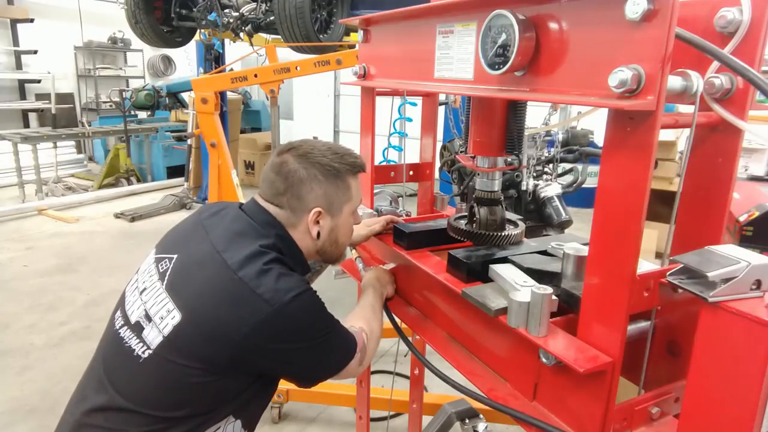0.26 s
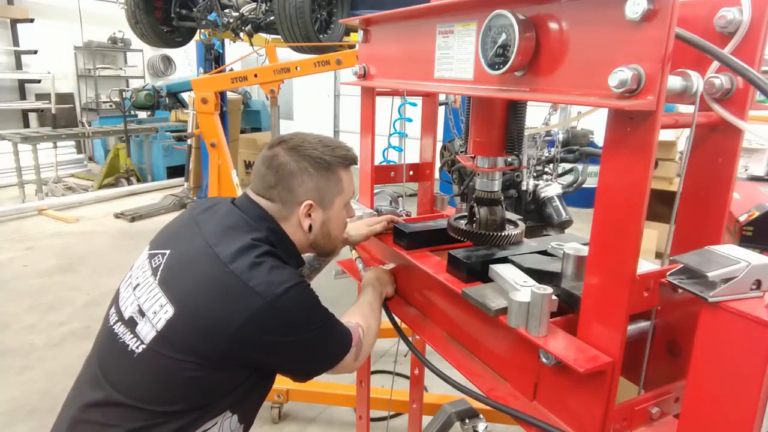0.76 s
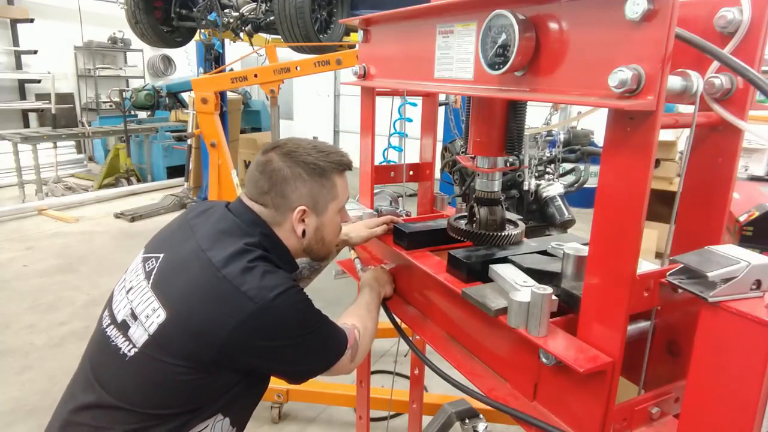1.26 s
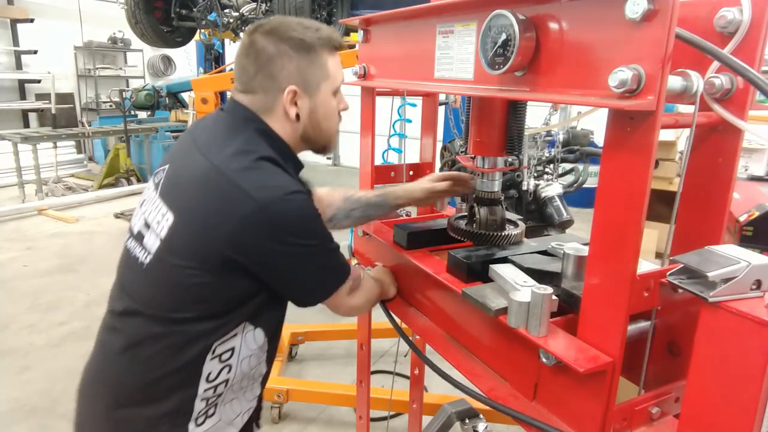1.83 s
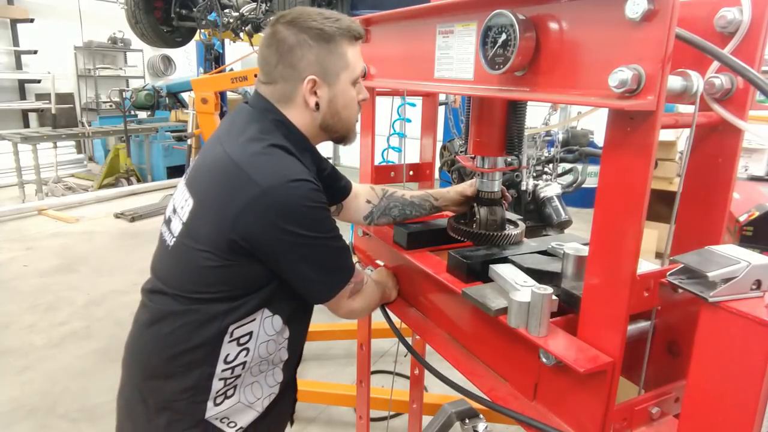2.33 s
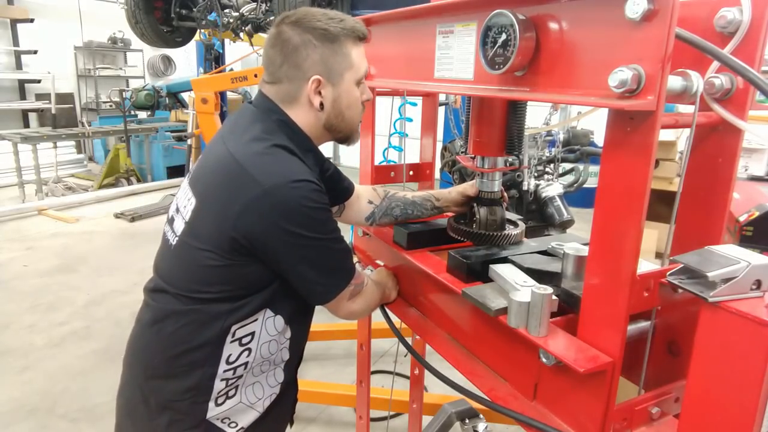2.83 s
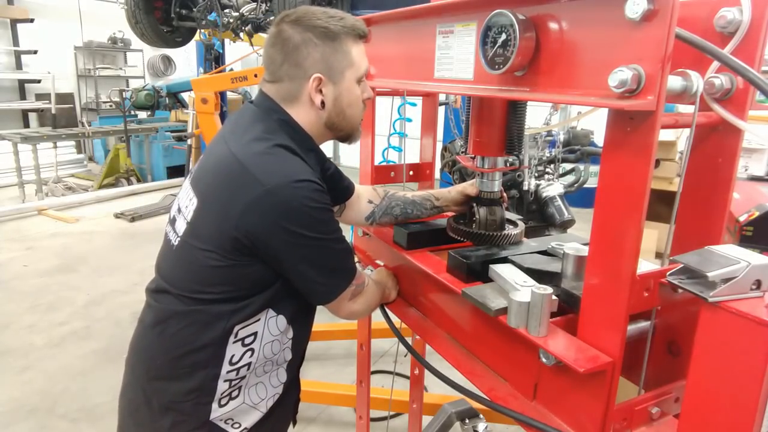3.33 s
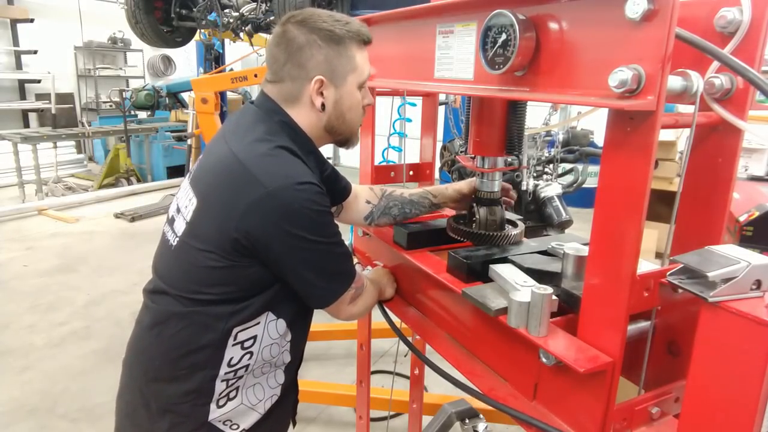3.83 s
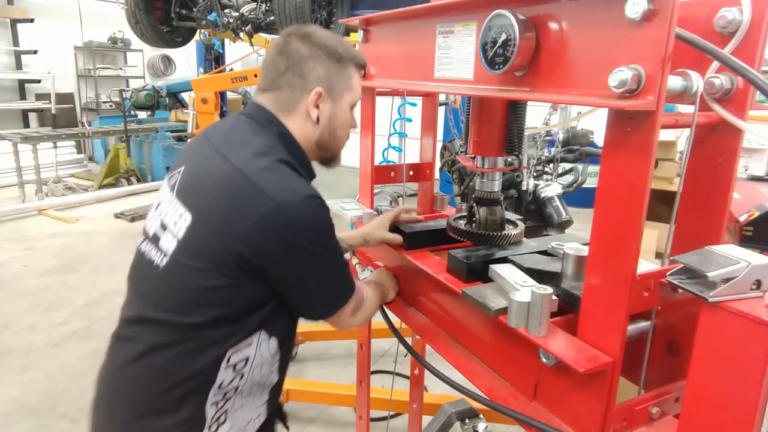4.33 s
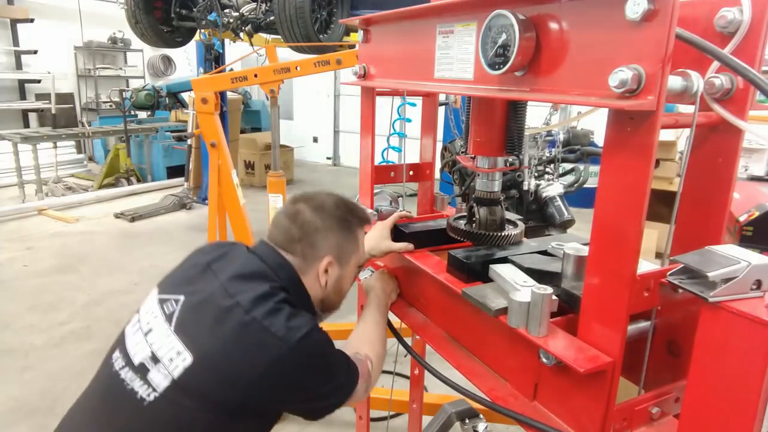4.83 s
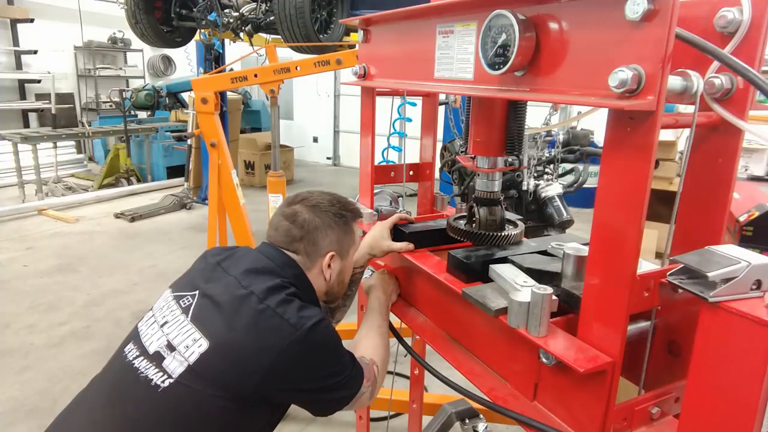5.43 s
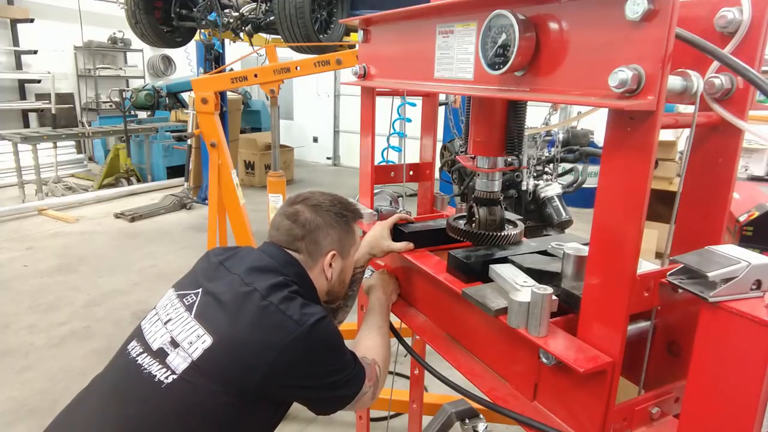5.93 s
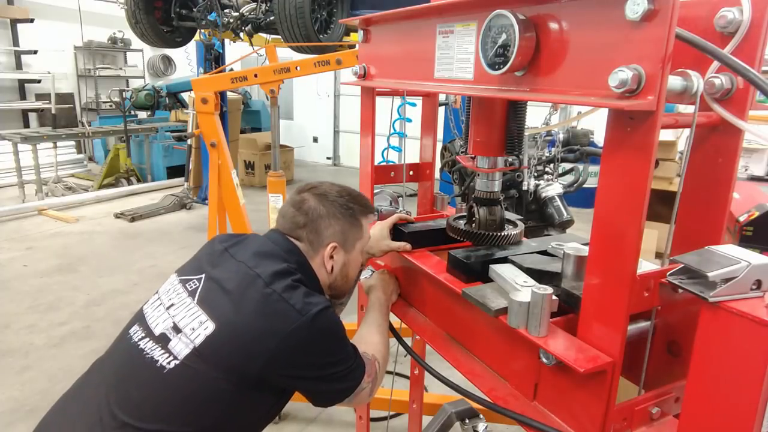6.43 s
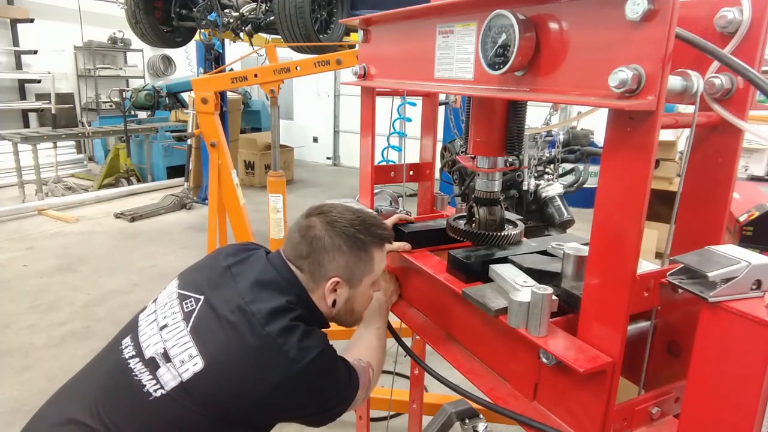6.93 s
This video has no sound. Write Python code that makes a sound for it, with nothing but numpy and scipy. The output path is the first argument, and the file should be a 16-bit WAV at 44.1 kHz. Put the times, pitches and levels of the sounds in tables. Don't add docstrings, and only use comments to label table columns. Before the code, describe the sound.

In a big hard-walled workshop, an air-powered press pump is already chattering close by, about nineteen strokes a second, each a bright valve hiss, metallic tick and dull exhaust pop shaking the steel frame. It weakens slightly, stops, and rings out. Over soft ventilation rumble come a small click, a scuff, a dull far knock, a rustle and tiny high squeaks, heard through two spaced microphone ports.

```python
import sys
import numpy as np
from scipy import signal
from scipy.fft import rfft, irfft, next_fast_len
from scipy.io import wavfile
from scipy.ndimage import uniform_filter1d

SR = 44100
rng = np.random.default_rng(int(sys.argv[2]) if len(sys.argv) > 2 else 0)


def how_loud(loudness_db):
    steps = np.asarray(loudness_db, float) / 20
    return 10 ** steps


def unload_audio(sound):
    columns = np.transpose(np.atleast_2d(sound))
    steps = np.round(np.clip(columns, -1, 1) * 32767)
    wavfile.write(sys.argv[1], SR, steps.astype(np.int16))


N = 316197
LEAD = int(1.5 * SR)
FULL = next_fast_len(N + 2 * LEAD)
HZ = np.maximum(np.arange(FULL // 2 + 1) * SR / FULL, 1)

# [f/Hz, level/dB per Hz]
AIR_FLOOR = [(25, -104), (58, -95), (72, -93), (92, -88), (110, -79), (250, -81), (500, -80.5),
             (900, -84.5), (1600, -91.5), (2800, -97), (5000, -102), (8000, -101), (12000, -103),
             (15500, -101)]
# [f/Hz, width/Hz, level/dB over it]
HUMS = [(110, 5, 7), (119, 2.5, 10), (155, 20, 5), (235, 8, 8), (266, 5, 5), (3620, 200, 6), (6450, 100, 3),
        (7250, 110, 7), (10000, 90, 7), (10750, 90, 6), (13800, 180, 5)]
# [t/s, rumble level/dB]
AMBIENCE = [
    (2.05, -68.5),
    (2.85, -62),
    (3.5, -62.5),
    (4.3, -61.5),
    (5.35, -62),
    (5.9, -64),
    (6.1, -65.5),
    (6.6, -67),
    (7.17, -68),
]
AIR_OVER_RUMBLE_DB = 3
# [t/s, f/Hz, level/dB]
ENGINE = [
    (2.3, 67.5, -85),
    (2.9, 68, -72),
    (4.1, 70.8, -72),
    (5.3, 72, -72),
    (6.3, 72.6, -81),
    (6.7, 68, -72),
]
# [f/Hz, level/dB over the rumble]
MOTOR = [(119.5, -5), (133, -1), (240, -7), (266, -.5), (399, -10)]
RIGHT_AHEAD_RAD = np.array([[0], [.7]])

# [f/Hz, t60/s, level/dB]
HALL = [(80, 1.6, 6), (242, 1.21, 4), (700, 1.62, -2), (1850, 1.66, -1), (4830, 1.23, 0.5), (9000, 0.58, 4),
        (14000, 0.33, 1.5)]
# [f/Hz, likeness/0-1, right lead/rad, left-right level/dB]
PORTS = [(99.7, 1, 1.52, 4.5), (300, 0.52, 1, -1.5), (970, 0.94, 0.27, 0.5), (2180, 0.97, 0.21, -2),
         (4350, 0.69, 0.3, -0.1), (6500, 0.88, 1.23, -0.3), (10000, 0.4, 1.7, 0), (11100, 0.73, 2.65, -3.5),
         (15500, 0.5, 4.5, -4.5)]
FLIP_HZ, FIRST_NULL_HZ = 1085, 1618

# [t/s, length/s, first f/Hz, last f/Hz, level/dB]
SQUEAKS = [
    (6.31, .03, 12900, 13300, -72),
    (6.345, .05, 14700, 15050, -70),
    (6.39, .13, 13500, 14800, -69),
    (6.618, .045, 15700, 14600, -68),
]
GLIDE_SHARE, SQUEAK_SWELL_DB = .6, 11

TICKS = [
    (5.933, -63, 8000, 2.5, 3),
    (6.668, -61, 5650, .2, 2.5),
]
SCUFFS = [
    (4.198, -48, 3900, 2.4, 25),
    (4.22, -62.5, 4940, .5, 310),
    (4.456, -45, 3240, 1.3, 13),
    (4.555, -49.5, 6500, 2.5, 73),
]
RUSTLES = [
    (4.96, -56.5, 8000, 2.2, 220),
]
TOUCH = [
    (4.400, -50.5, 9000, 2.8, 67),
    (4.407, -37, 636, 1.58, 150),
    (4.63, -36, 1120, 0.43, 4.2),
]
KNOCK = [
    (4.422, -28.5, 203, 1.54, 15),
    (4.461, -25, 830, 0.94, 17.4),
    (4.458, -35.5, 1840, 0.63, 28),
    (4.47, -50, 2670, .16, 49),
    (4.476, -26, 431, 0.77, 15.4),
    (4.5, -51, 2720, 0.93, 130),
    (4.505, -32.5, 300, 1.6, 43),
    (4.53, -47, 130, 0.92, 46),
    (4.565, -37, 300, 1.9, 5.7),
]
TICK_RISE_MS, TOUCH_RISE_MS, KNOCK_RISE_MS, SCUFF_RISE_MS, RUSTLE_RISE_MS = .7, 4, 12, 42, 250

# [t/s, level/dB]
CLICK = (3.1984, -32)
# [f/Hz, level/dB, t60/s]
CLICK_MODES = [(1000, -5, .008), (1400, 0, .011), (3700, -14, .006)]

STROKE_S, LAST_POP_S, STROKE_COUNT, STROKE_JITTER_S = .0525, 1.3889, 53, .0001
HISS_LEAD_S = .0162
POP_DB, VALVE_DB = -4, -16
SAG_FROM_S, SAG_DB_PER_S = 0.41, 2
POP_SCATTER_DB, VALVE_SCATTER_DB = 0.66, 1.22

# [f/Hz, level/dB per Hz]
HISS = [(500, -91.5), (1200, -72.5), (2200, -66.5), (3300, -70.5), (4000, -70), (6000, -70.5),
        (8000, -66.5), (11500, -67.5), (12600, -61.5), (13500, -64.5), (15500, -68)]
# [f/Hz, level/dB under the hiss, t60/s]
SPOOL = [(3443, -11, 0.02), (13600, -4, 0.0076)]
# [f/Hz, left level/dB per Hz, right level/dB per Hz]
POP = [(60, -22, -57), (150, -15, -11), (290, -10, -5), (453, -0.5, -1.5), (670, 2.1, 7), (696, 0, 3.5),
       (907, -8, -4.5), (1327, -8.5, -4), (1680, -36, -10.5), (1970, -57, -11.5), (1980, -51.5, -47)]
POP_CAUSAL, POP_LAG_RAD = .6, .95
# [t/ms, left level/dB, right level/dB]
ECHOES = [(-13.7, -18, -19), (-11.8, -17, -19), (0, 0, -6.5), (1.7, -11.5, -13.5), (5.4, -8, -10),
          (9.6, -15, -19), (10.8, -18, -30), (12.5, -12, -19), (14.9, -14, -16), (16.9, -12, -15),
          (19.7, -16, -24), (21.9, -15, -21)]
# [f/Hz, left level/dB, right level/dB, t60/s]
FRAME = [(78.4, -43, -63, 0.17), (99.3, -24, -45, 0.29), (112, -56, -38, 0.17), (172.3, -31.5, -53, 0.57),
         (222.2, -25.5, -36, 0.37), (305, -22, -41.5, 0.14), (360, -29.5, -40, 0.25),
         (409, -20, -28.5, 0.36), (531.5, -22.5, -30, 0.37), (639, -26, -37, 0.2), (696, -23.5, -32, 1),
         (740, -25.5, -39, 0.17), (1376, -40, -27, 0.15)]


def rms_one(x):
    return x / np.sqrt(np.mean(x ** 2) + 1e-20)


def at_hz(table, column=1):
    table = np.array(table)
    return np.interp(np.log(HZ), np.log(table[:, 0]), table[:, column])


def clicks(s, db):
    out = np.zeros(FULL)
    np.add.at(out, np.round(np.asarray(s) * SR).astype(int) + LEAD, how_loud(np.asarray(db)))
    return out


def filtered(x, response):
    return irfft(rfft(x, FULL) * response, FULL)


def ring(blows, hz, t60):
    r, w = how_loud(-60 / (t60 * SR)), 2 * np.pi * hz / SR
    ringing = signal.lfilter([.5, 0, -.5], [1, -2 * r * np.cos(w), r * r], blows + 1e-18)
    return filtered(ringing, 1 / (1 + (HZ / hz / 2) ** 4) / (1 + (hz / HZ / 2) ** 4))


def contacts(table, rise_ms):
    out, half = np.zeros((2, FULL)), SR // 2
    ms = np.arange(-half, 2 * half) * 1000 / SR
    for s, level_db, hz, octaves, decay_ms in table:
        edges = np.clip(hz * 2 ** (np.array([-.5, .5]) * octaves), 20, .45 * SR)
        band = signal.butter(3, edges, "band", fs=SR, output="sos")
        noise = signal.sosfilt(band, rng.standard_normal((2, len(ms))))
        rise = np.maximum(1 + ms / rise_ms, 0)
        shape = np.where(ms < 0, rise, np.exp(-np.abs(ms) / decay_ms))
        start = round(s * SR) + LEAD - half
        out[:, start:start + len(ms)] += how_loud(level_db) * shape * rms_one(noise)
    return out


def ports(first, second):
    swing = np.sin(np.pi * (FIRST_NULL_HZ - HZ) / FLIP_HZ)
    sign = np.where(HZ < FIRST_NULL_HZ - FLIP_HZ / 2, 1, swing)
    alike = np.clip(at_hz(PORTS), 0, .99) * sign
    lead = np.exp(1j * at_hz(PORTS, column=2))
    tilt = how_loud(at_hz(PORTS, column=3) / 2)
    a, b = rfft(first), rfft(second)
    right = alike * lead * a + np.sqrt(1 - alike ** 2) * b
    return irfft(np.array([a * tilt, right / tilt]), FULL)


def hall_response():
    t, tails = np.arange(LEAD) / SR, 0
    white = rfft(rng.standard_normal((2, LEAD)))
    tail_hz = np.arange(LEAD // 2 + 1) * SR / LEAD + 1
    place = np.interp(np.log(tail_hz), np.log(np.array(HALL)[:, 0]), range(len(HALL)))
    for k, (hz, t60, level_db) in enumerate(HALL):
        band = irfft(white * np.clip(1 - abs(place - k), 0, 1), LEAD)
        tails = tails + band * how_loud(level_db - 60 * t / t60)
    build_up = 1 - np.exp(-(t / 0.0055) ** 2)
    return rfft(tails * build_up / np.sqrt(SR / 10), FULL)


def background():
    colour = how_loud(at_hz(AIR_FLOOR))
    for hz, width_hz, level_db in HUMS:
        colour = colour * (1 + (how_loud(level_db) - 1) / (1 + (2 * (HZ - hz) / width_hz) ** 2))
    noise = ports(*rng.standard_normal((2, FULL)))
    airy = HZ ** 2 / (HZ ** 2 + 2500 ** 2)
    s, rumble_db = np.transpose(AMBIENCE)
    level_db = np.interp((np.arange(FULL) - LEAD) / SR, s, rumble_db)
    rumble = rms_one(filtered(noise, colour * (1 - airy)))
    leak = rms_one(filtered(noise, colour * airy))
    return how_loud(level_db + 11) * rumble + how_loud(level_db + AIR_OVER_RUMBLE_DB + 1.5) * leak


def far_engine():
    t = np.arange(N) / SR
    s, hz, level_db = np.transpose(ENGINE)
    fade = np.clip(np.minimum(t - s[0], s[-1] - t) / 0.25, 0, 1)
    phase = 2 * np.pi * np.cumsum(np.interp(t, s, hz)) / SR
    return fade * how_loud(np.interp(t, s, level_db) + 5.0) * np.sin(phase + RIGHT_AHEAD_RAD)


def motor():
    out, t = np.zeros((2, N)), np.arange(N) / SR
    s, rumble_db = np.transpose(AMBIENCE)
    for hz, level_db in MOTOR:
        waver_db = np.interp(t, np.arange(40) / 5, rng.normal(0, 2.2, 40))
        level = how_loud(np.interp(t, s, rumble_db) + level_db + waver_db)
        out += level * np.sin(2 * np.pi * hz * t + RIGHT_AHEAD_RAD)
    return out


def squeaks():
    out, t = np.zeros(N), np.arange(N) / SR
    for s, length, first_hz, last_hz, level_db in SQUEAKS:
        done = (t - s) / length
        hz = first_hz + (last_hz - first_hz) * np.clip(done / GLIDE_SHARE, 0, 1)
        swell_db = -SQUEAK_SWELL_DB * np.clip(2 * done - 1, -1, 1) ** 2
        level = (abs(done - .5) < .5) * how_loud(level_db + swell_db)
        out += level * np.sin(2 * np.pi * np.cumsum(hz) / SR)
    roughness = rms_one(uniform_filter1d(rng.standard_normal((2, N)), size=150))
    return out * how_loud(3 * roughness)


def far_knock():
    return contacts(TOUCH, TOUCH_RISE_MS) + contacts(KNOCK, KNOCK_RISE_MS)


def near_friction():
    ticks = contacts(TICKS, TICK_RISE_MS)
    return ticks + contacts(SCUFFS, SCUFF_RISE_MS) + contacts(RUSTLES, RUSTLE_RISE_MS)


def click():
    s, click_db = CLICK
    return sum(ring(clicks([s], [click_db + level_db]), hz, t60) for hz, level_db, t60 in CLICK_MODES)


def stroke_table():
    s = LAST_POP_S - STROKE_S * np.arange(STROKE_COUNT)[::-1]
    sag_db = SAG_DB_PER_S * np.maximum(s - SAG_FROM_S, 0)
    chance = rng.standard_normal((STROKE_COUNT, 3))
    pop_db = POP_DB - sag_db + POP_SCATTER_DB * chance[:, 0]
    hiss_db = VALVE_DB - sag_db + VALVE_SCATTER_DB * chance[:, 1]
    return s + STROKE_JITTER_S * chance[:, 2], pop_db, hiss_db


def spool(s, hiss_db):
    out = np.zeros(FULL)
    for hz, level_db, t60 in SPOOL:
        tick_db = hiss_db + level_db + rng.normal(0, 0.97, len(s))
        out += ring(clicks(s - HISS_LEAD_S + 14 / hz, tick_db), hz, t60)
    return out


def valve_hiss(s, hiss_db):
    t = np.arange(SR // 5) / SR
    spurt = (1 - np.exp(-t / 0.0014)) ** 2 * (np.exp(-t / 0.0048) + 0.68 * np.exp(-t / 0.026))
    blow = (1 - np.exp(-t / 0.0041)) ** 2 * (np.exp(-t / 0.0045) + .5 * np.exp(-t / 0.038)) * how_loud(2.5)
    opened = rfft(clicks(s - HISS_LEAD_S, hiss_db))
    air = rms_one(filtered(rng.standard_normal((2, FULL)), how_loud(at_hz(HISS))))
    thin = filtered(air, HZ ** 4 / (HZ ** 4 + 6300.0 ** 4))
    full = air - thin
    return how_loud(-1.5) * (filtered(spurt, opened) * thin + filtered(blow, opened) * full)


def puff_colour():
    log_gain = np.log(how_loud(np.array([at_hz(POP), at_hz(POP, column=2)])))
    n = np.arange(FULL)
    folded = irfft(log_gain, FULL) * np.sign(FULL / 2 - n) * (n > 0)
    phase = POP_CAUSAL * rfft(folded).imag - POP_LAG_RAD
    shape = irfft(np.exp(log_gain + 1j * phase), FULL)
    return rfft(np.roll(shape, -np.argmax(shape[0]), axis=1))


def exhaust_pops(s, pop_db):
    puff = filtered(clicks(s, pop_db), puff_colour())
    puff = puff * how_loud(pop_db.max() - 1.1) / puff[0].max()
    ms, *echo_db = np.transpose(ECHOES)
    echoes = [np.roll(clicks(ms / 1000, db), -LEAD) for db in echo_db]
    out = filtered(puff, rfft(echoes))
    for hz, left_db, right_db, t60 in FRAME:
        blows = clicks(s, pop_db + rng.normal(0, 1.0, len(s)))
        out += ring(blows, hz, t60) * how_loud(np.array([[left_db], [right_db]]))
    return out, puff.mean(axis=0)


def scene():
    s, pop_db, hiss_db = stroke_table()
    pop, puff = exhaust_pops(s, pop_db)
    valve = valve_hiss(s, hiss_db) + spool(s, hiss_db)
    near = click() + near_friction()
    far = far_knock()
    hall_send = how_loud(-3.0) * puff + how_loud(-5) * valve[0] + how_loud(-7) * near[0] + how_loud(-2.0) * far[0]
    diffuse = ports(*(filtered(hall_send, hall_response()) + valve + near + far))
    padded = pop + diffuse + background()
    return padded[:, LEAD:LEAD + N] + squeaks() + far_engine() + motor()


def low_pass(x):
    return signal.sosfilt(signal.butter(12, 16920, fs=SR, output="sos"), x)


def record(dry):
    rounded = 1.4 * np.tanh(dry / 1.4)
    mix = filtered(rounded, np.clip((15830 - HZ) / 120, 0, 1))[:, :N]
    return low_pass(mix)


dry = scene()
out = record(dry)
unload_audio(out)
```